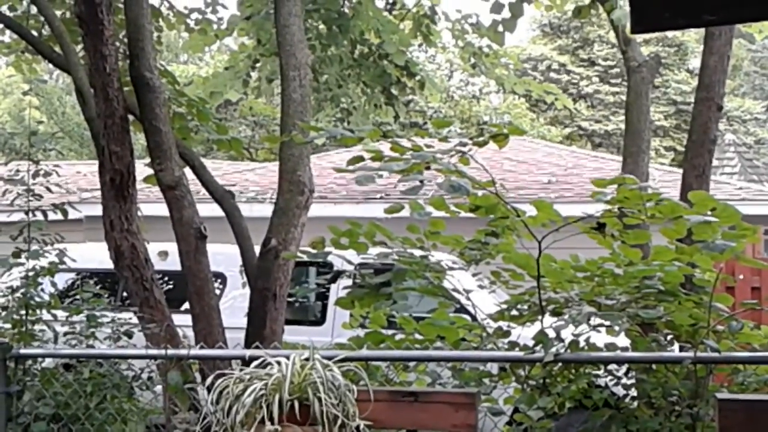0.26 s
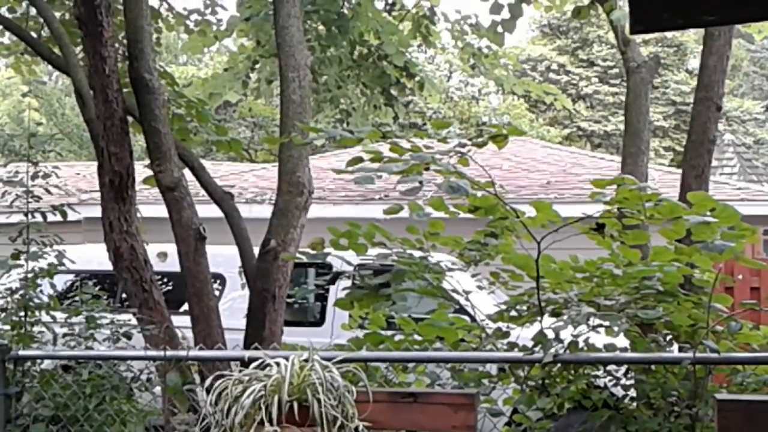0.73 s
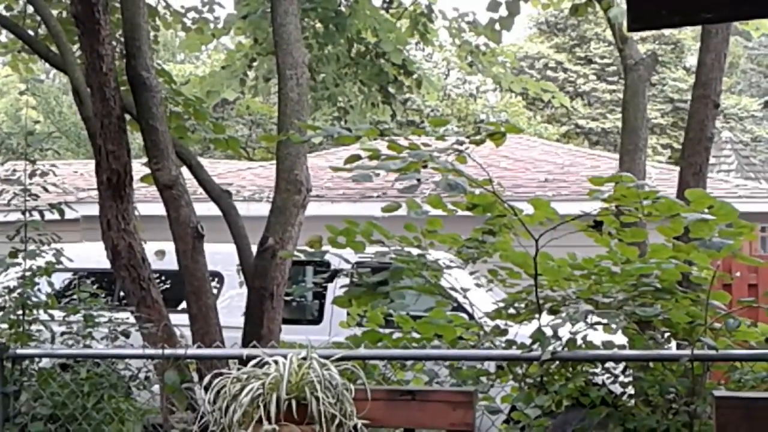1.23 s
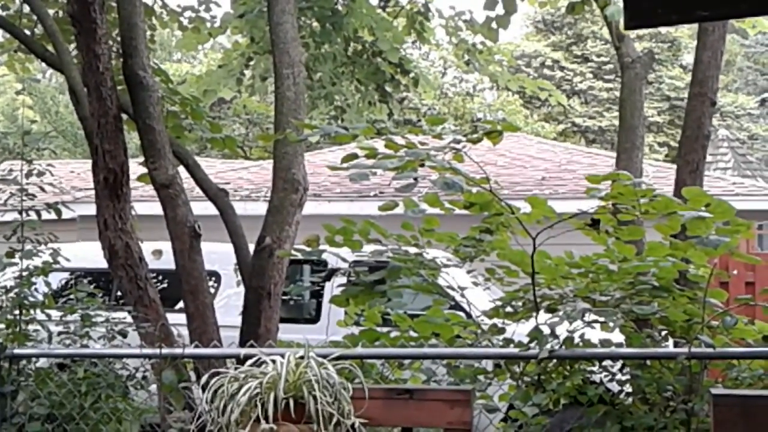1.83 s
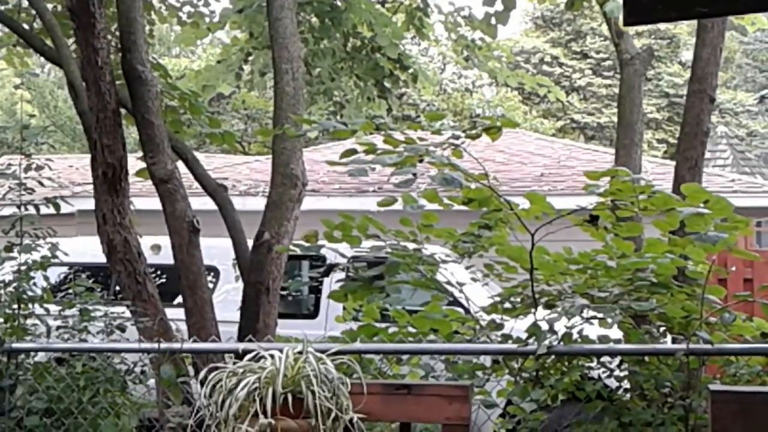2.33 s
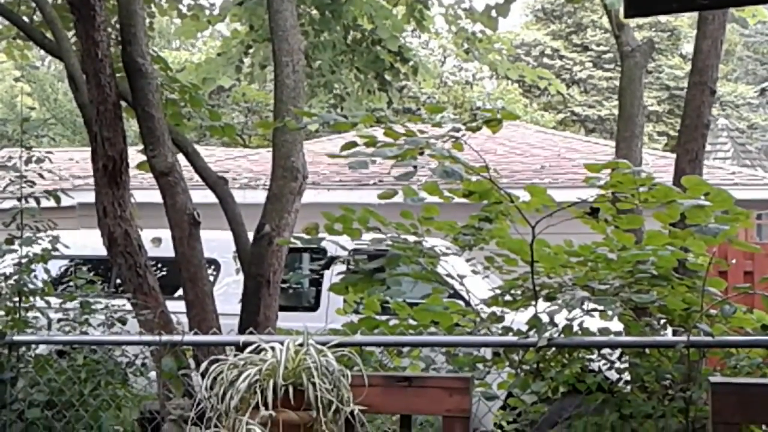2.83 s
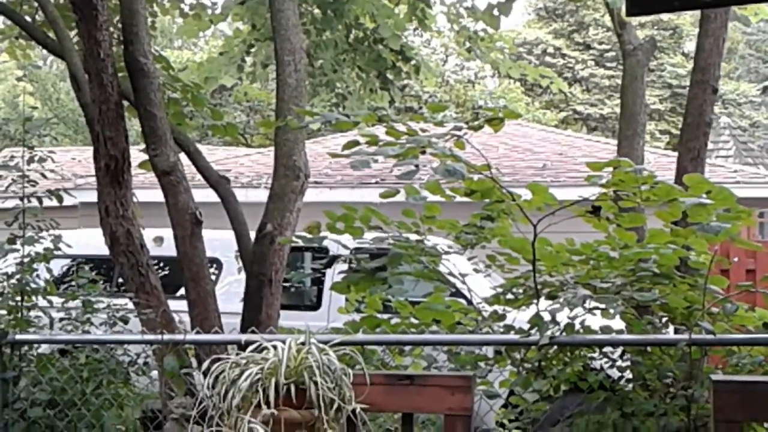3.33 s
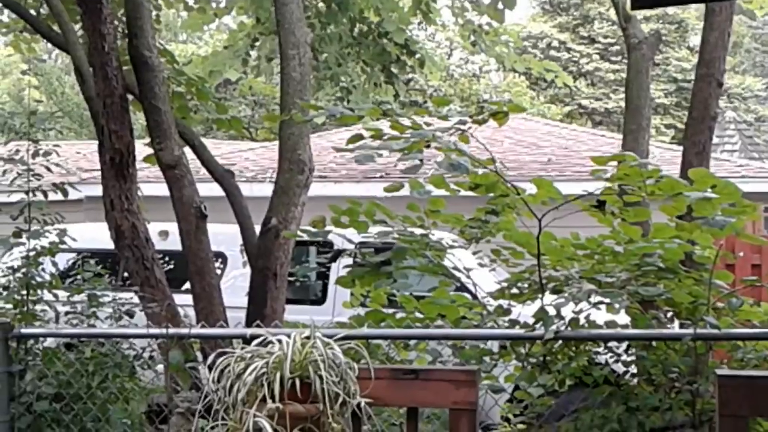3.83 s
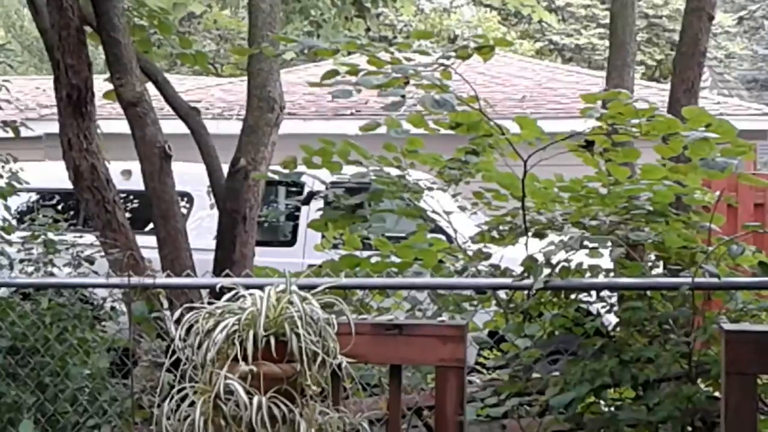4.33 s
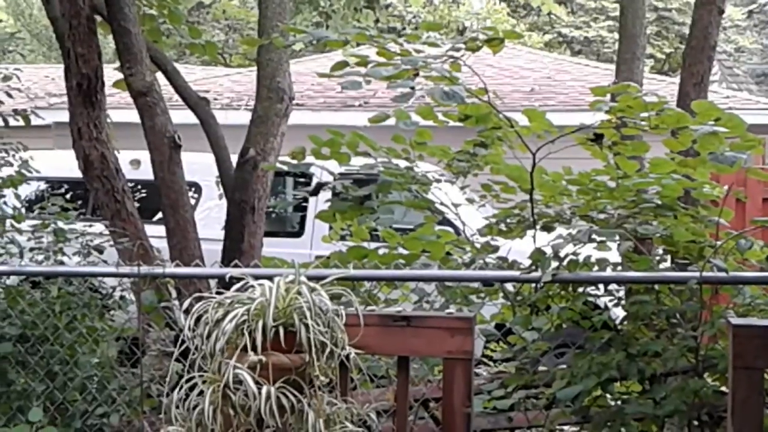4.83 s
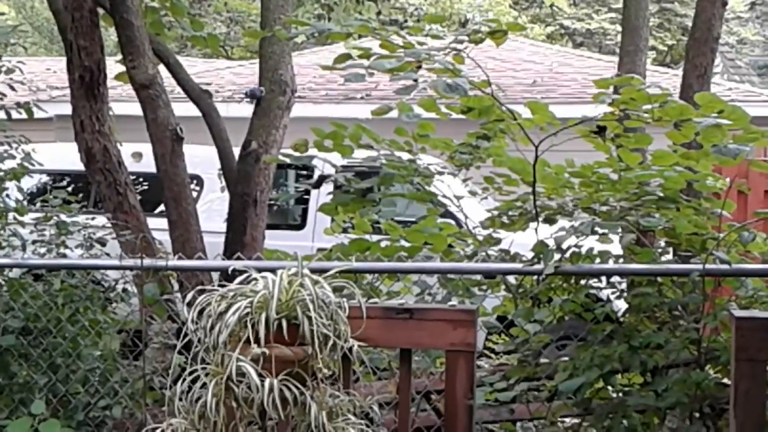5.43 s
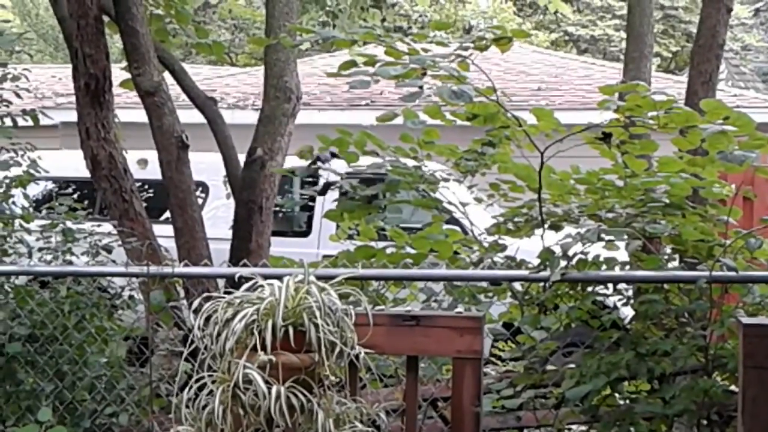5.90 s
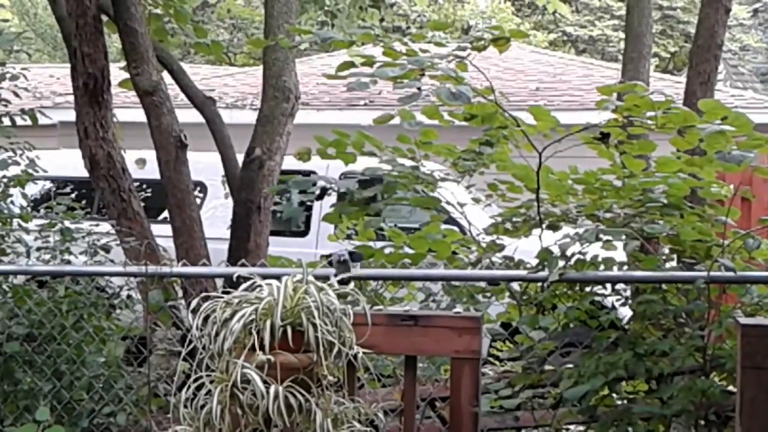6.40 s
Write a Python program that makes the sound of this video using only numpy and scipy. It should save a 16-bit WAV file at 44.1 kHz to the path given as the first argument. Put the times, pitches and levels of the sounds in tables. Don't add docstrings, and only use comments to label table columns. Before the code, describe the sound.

Quiet wooded backyard with low distant traffic hum and thin insect hiss throughout. A jay peeps faintly, small birds slur brief high whistles, and the jay gives spaced squeaks. Claws crack and scrape close by on wood, then a short loud rasping scream bursts out and echoes off houses and trees. Softer hoots and murmurs follow. The handheld microphone's left side is muffled until a finger slips off; whistles and faint claw ticks end it.

```python
import sys
import numpy as np
from scipy import signal
from scipy.fft import rfft, irfft
from scipy.io import wavfile
from scipy.ndimage import uniform_filter1d

SR = 44100
rng = np.random.default_rng(int(sys.argv[2]) if len(sys.argv) > 2 else 0)


def generate_wav(signal):
    frames = np.transpose(np.atleast_2d(signal))
    scaled = np.clip(frames, -1, 1) * 32767
    pcm = np.round(scaled).astype(np.int16)
    wavfile.write(sys.argv[1], SR, pcm)


def convert_level_to_amplitude(level_db):
    exponent = np.asarray(level_db, float) / 20
    return 10 ** exponent


N = 293706
T = np.arange(N) / SR
HZ = np.maximum(np.fft.rfftfreq(N, 1 / SR), 1)


def on_log(table):
    hz, value = np.transpose(table)
    return np.interp(np.log(HZ), np.log(hz), value)


def colour(x, table):
    return irfft(rfft(x) * convert_level_to_amplitude(on_log(table)), N)


def hiss(table, channels):
    return colour(rng.standard_normal((channels, N)), table) * np.sqrt(SR / 2)


def walk(rate_hz):
    hold = int(SR / rate_hz)
    held = np.repeat(rng.standard_normal(8000), hold)[:N]
    return 1.3 * uniform_filter1d(uniform_filter1d(held, hold), hold)


def envelope(s, db, edge_s=0.003):
    edge = np.clip(np.minimum(T - s[0] + edge_s, s[-1] + edge_s - T) / edge_s, 0, 1)
    return convert_level_to_amplitude(np.interp(T, s, db)) * edge


def gesture(start_s, length_s, first, last, peak_db, kind):
    # peak_place (0-1 of length), rise_db, fall_db, haste (over 1 glides early)
    effort_shapes = dict(squeak=(0.49, 11.6, 10, 0.72), chirp=(0.2, 3.3, 2.1, 2.66), yip=(.3, 3, 5.2, 1.4),
                     hoot=(0.81, 7.2, 8.5, 0.688), coo=(.3, 4, 2.7, 1.6), murmur=(0.16, 1.7, 5.8, 0.56),
                     squawk=(.3, 2.3, 6.7, 0.97), growl=(0.57, 5.1, 9, 0.99), cluck=(0.32, 5, 5.3, 1.1),
                     peep=(.45, 14, 4.3, 3.47), bark=(.3, 2.8, 7.8, 1.03), whistle=(.25, 5.9, 13.6, 1.35),
                     dive=(0.9, 13, 2.8, 1.165), scrape=(.3, 7, 6.6, 1.2))
    peak, rise_db, fall_db, haste = effort_shapes[kind]
    peak = np.clip(peak, 0.05, 0.95)
    u = np.linspace(0, 1, num=25)
    control = last + (first - last) * (1 - u) ** max(haste, 0.2)
    db = peak_db - np.interp(u, [0, peak, 1], [rise_db, 0, fall_db])
    return np.transpose([start_s + length_s * u, control, db])


def voice(rows, overtone_gain, count, rasp, jitter=0.007):
    s, hz, db = np.transpose(rows)
    gain = envelope(s, db) * (1 - rasp + rasp * walk(1100))
    on = gain != 0
    glide = uniform_filter1d(np.interp(T, s, hz), size=120)
    pitch = (glide * (1 + jitter * walk(300)))[on]
    phase = 2 * np.pi * np.cumsum(pitch) / SR
    flicker = convert_level_to_amplitude(min(25 * rasp, 4) * walk(70))
    stack = 0
    for k in range(1, count + 1):
        own_flicker = np.roll(flicker, 9000 * k)[on]
        stack = stack + own_flicker * overtone_gain(k, k * pitch) * np.sin(k * phase)
    gain[on] *= np.sqrt(2) * stack
    return gain


def traffic():
    # pitch_hz, density_db (per Hz)
    hum_spectrum = [(20, -114), (40, -91), (60, -84.5), (100, -89), (130, -86), (250, -95.5), (600, -99.5),
                    (1000, -99), (2000, -105), (3000, -111), (6000, -122), (16000, -130)]
    # pitch_hz, likeness (0-1)
    port_likeness = [(20, 0), (120, 1), (300, .7), (700, 0.59), (2000, 0), (5000, 0.82)]
    common, *own = rfft(hiss(hum_spectrum, channels=3))
    like = np.clip(on_log(port_likeness), 0, 1)
    hum = irfft(np.sqrt(like) * common + np.sqrt(1 - like) * np.array(own), N)
    return hum * convert_level_to_amplitude(0.25 * (T - 0.5) + walk(2.363))


def insects():
    # pitch_hz, density_db (per Hz)
    insect_band = [(3200, -125), (3900, -109), (4500, -102), (5100, -106), (5600, -122)]
    left_right_db = np.array([[-6.0], [0]])
    chorus = hiss(insect_band, channels=2) * convert_level_to_amplitude(left_right_db)
    return chorus * convert_level_to_amplitude(1.2 * walk(3) + 1.5 * walk(12))


def claw_ticks():
    # start_s, peak_db, ring_hz, t60_s, crack_db
    tick_rows = [(2.4, -29, 3340, 0.0023, -22), (2.402, -37, 4340, 0.011, -20),
                 (2.408, -34, 3500, 0.027, -15), (2.408, -42, 480, 0.036, -20),
                 (2.408, -45, 1950, 0.025, -20), (2.426, -42, 5000, 0.015, -17),
                 (2.43, -45, 708, 0.013, -17), (3.856, -51, 4240, 0.029, -5.5),
                 (3.949, -57, 3000, 0.028, -13.5), (4.636, -72, 1460, .02, -15),
                 (6.316, -51, 1770, 0.011, -16), (6.557, -58, 2760, 0.013, -5.5),
                 (6.595, -46.5, 2200, 0.029, -2)]
    out = np.zeros(N)
    t = T[:SR // 10]
    crack = 2 * uniform_filter1d(rng.standard_normal(len(t)), size=5) * np.exp(-t / 0.00019)
    for s, db, hz, t60, crack_db in tick_rows:
        ring = np.sin(2 * np.pi * hz * t) * np.exp(-np.log(1000) * t / t60)
        i = int(s * SR)
        out[i:i + len(t)] += (convert_level_to_amplitude(db) * (ring + convert_level_to_amplitude(crack_db) * crack))[:N - i]
    return out


def claw_scrapes():
    # start_s, length_s, bark_share_from (0-1, rest is branch), bark_share_to (0-1), peak_db
    scrape_rows = [
        (2.427, 0.073, .95, 0.35, -41.5),
        (2.478, 0.11, 0.2, .1, -50.5),
        (3.697, 0.057, 1, 1, -61.5),
        (6.289, 0.11, 0.4, 0.87, -62.5),
        (6.552, 0.031, 0.1, .1, -61.5),
        (6.593, 0.01, 0.6, 1, -57),
        (6.599, .05, 0.8, 0.7, -68.5),
    ]
    # pitch_hz, gain_db
    bark_body = [(500, -23.5), (1500, 3.5), (2300, 2), (3700, 5), (4600, -6), (5500, -13), (8000, -28),
                 (16000, -42.5)]
    # pitch_hz, gain_db
    branch_body = [(100, -32.5), (250, 3), (600, 4.5), (1200, 11.5), (1700, 0.5), (2500, -42),
                   (16000, -58.5)]
    bark = colour(rng.standard_normal(N) * convert_level_to_amplitude(2.0 * walk(300)), bark_body)
    branch = colour(rng.standard_normal(N) * convert_level_to_amplitude(2.0 * walk(300)), branch_body)
    out = np.zeros(N)
    for row in scrape_rows:
        s, share, db = gesture(*row, "scrape").T
        bright = np.clip(np.interp(T, s, share), 0, 1)
        grains = np.sqrt(bright) * bark / bark.std() + np.sqrt(1 - bright) * branch / branch.std()
        out += envelope(s, db) * grains
    return out


def songbirds():
    # start_s, length_s, pitch_from_hz, pitch_to_hz, peak_db
    whistle_rows = [(0.39, 0.017, 3930, 4230, -49), (0.409, 0.032, 4230, 3660, -52),
                    (0.446, 0.0315, 3560, 3800, -47.5), (0.569, 0.03, 3740, 3517, -52.5),
                    (0.594, 0.012, 3640, 5200, -51), (2.458, 0.041, 5370, 5570, -56.5),
                    (2.926, .018, 4270, 4380, -50.5), (2.993, 0.021, 3930, 4270, -55),
                    (3.125, 0.024, 4130, 4170, -55), (3.832, 0.018, 4330, 4800, -52.5),
                    (4.07, 0.019, 3890, 4860, -50.5), (4.089, 0.028, 5110, 5200, -62.5),
                    (4.394, 0.01795, 3150, 2492, -53.5), (4.41, 0.019, 2470, 2480, -59),
                    (4.688, 0.025, 2700, 2950, -62), (4.723, 0.031, 3250, 2530, -60.5),
                    (4.743, 0.05, 2484, 2495, -57), (6.285, 0.045, 7100, 6950, -66.5)]

    def faint_octave(k, hz):
        return convert_level_to_amplitude(-20 * (k - 1))

    out = 0
    for row in whistle_rows:
        kind = "dive" if row[3] < 0.83 * row[2] else "whistle"
        out = out + voice(gesture(*row, kind), faint_octave, count=2, rasp=0.17, jitter=0.012)
    return out


def jay():
    # time_s, pitch_hz, level_db
    scream = [
        (2.693, 1322, -42),
        (2.705, 1193, -29),
        (2.721, 1123, -24),
        (2.73, 1022, -23),
        (2.736, 1080, -19.5),
        (2.739, 1052, -23.5),
        (2.745, 1064, -27),
        (2.747, 1064, -34.5),
    ]
    # start_s, length_s, pitch_from_hz, pitch_to_hz, peak_db
    squeaks = [
        (1.142, 0.021, 1016, 1096, -36.5),
        (1.745, 0.036, 971, 1255, -40),
        (3.118, 0.0244, 1004, 1108, -36.5),
    ]
    chirps = [
        (1.165, .032, 1086, 1336, -41.5),
    ]
    yips = [
        (.795, 0.041, 773, 914, -51),
    ]
    hoots = [
        (.84, 0.03, 865, 770, -60),
        (1.398, 0.016, 774, 607, -55.5),
        (2.957, .043, 865, 1008, -50.5),
        (3.04, 0.0614, 821, 924.4, -40.5),
        (3.102, 0.031, 941, 1010, -45.5),
        (3.142, 0.021, 1152, 1250, -46.5),
        (3.322, 0.025, 551, 599.4, -54),
        (3.866, 0.0217, 821, 736, -59),
    ]
    coos = [
        (3.343, .058, 618.3, 632.4, -49),
    ]
    murmurs = [
        (3.4, 0.019, 632, 656, -53.5),
        (3.45, 0.044, 637.4, 650, -56.5),
        (3.51, 0.034, 656.6, 700, -57),
    ]
    squawks = [
        (2.75, 0.0396, 1167, 1238, -28),
        (2.785, 0.18, 1324, 1166, -40),
    ]
    barks = [
        (3.858, 0.0094, 1061, 875, -51),
        (3.868, .012, 1145, 990, -55),
    ]
    growls = [
        (2.738, 0.033, 575.3, 607.6, -27),
    ]
    clucks = [
        (1.378, .022, 950, 797, -51.5),
        (3.018, 0.02, 919.5, 890, -44.5),
    ]
    peeps = [
        (.108, .065, 660, 941, -56.5),
        (.2, 0.092, 940, 980, -76),
    ]
    # mouth_hz, width_hz, fundamental_db
    mouths = dict(scream=(2080, 590, -17), squeak=(2140, 850, -12.5), chirp=(2240, 1660, -14),
              yip=(2250, 1470, -1.5), hoot=(1990, 1070, 5.5), cluck=(1750, 650, -11.5),
              peep=(2480, 1300, -16), growl=(2070, 1170, -20), coo=(2160, 1070, -3),
              murmur=(1400, 1800, 1.1), squawk=(2000, 1130, -10), bark=(2080, 3900, -3))
    rasps = dict(scream=.02, squeak=.1, chirp=.2, yip=.09, hoot=.12, coo=.17, murmur=.25, squawk=.45, growl=.6, cluck=.14, peep=.25, bark=.85)
    # pitch_hz, gain_db
    beak = [(300, -44), (600, 1.5), (3300, 0.5), (4200, 3.5), (5200, -3), (6200, -0.5), (7300, 2.5),
            (9000, -13.5), (16000, -50.5)]
    calls = dict(squeak=squeaks, chirp=chirps, yip=yips, hoot=hoots, coo=coos, murmur=murmurs,
                 squawk=squawks, bark=barks, growl=growls, cluck=clucks, peep=peeps)
    notes = [("scream", scream)]
    for kind, rows in calls.items():
        notes += [(kind, gesture(*row, kind)) for row in rows]
    out = 0
    for kind, rows in notes:
        mouth_hz, width_hz, low_db = mouths[kind]

        def throat(k, hz):
            if k == 1:
                return convert_level_to_amplitude(low_db)
            return 1 / (1 + (2 * (hz - mouth_hz) / width_hz) ** 2) ** 1.116

        out = out + voice(rows, throat, count=7, rasp=rasps[kind])
    return colour(out, beak)


def echo(x, wet_db, length=1.0):
    # band_top_hz, near_walls_t60_s, far_trees_t60_s
    decay_bands = [
        (920, 0.25, 1.62),
        (1554, 0.43, 1.56),
        (3000, 0.36, 1.67),
        (5000, 0.58, 1.46),
        (15800, 0.85, 1.9),
    ]
    # pitch_hz, gain_db
    echo_tint = [(500, -12.5), (860, 5), (1050, -8), (1300, 0), (1520, -4.5), (2100, -4), (2500, 5.5),
                 (3100, -2.5), (3700, -9), (8000, -8.5)]
    first_s, rise_s, far_db, sway_s = 0.013, 0.00074, -13, 0.0001
    size = 2 * SR
    t = T[:size]
    response = np.zeros((2, size))
    lumpy = rng.standard_normal((2, size)) * convert_level_to_amplitude(-0.5 * walk(120)[:size])
    low = 200
    for top, near_s, far_s in decay_bands:
        band = signal.sosfilt(signal.butter(2, [low, top], "bandpass", fs=SR, output="sos"), lumpy)
        near = convert_level_to_amplitude(-60 * t / near_s / length)
        far = convert_level_to_amplitude(far_db - 60 * t / far_s / length)
        response += band * (near + far)
        low = top
    response *= np.clip((t - first_s) / rise_s, 0, 1) * convert_level_to_amplitude(wet_db)
    wet = signal.fftconvolve(colour(x, echo_tint)[None], response, axes=1)[:, :N]
    return x + np.array([np.interp(T + sway_s * walk(25), T, port) for port in wet])


def scene():
    background = traffic() + insects()
    wood = echo(claw_ticks() + claw_scrapes(), wet_db=-39)
    small_birds = echo(songbirds(), wet_db=-20.5, length=0.38)
    return background + wood + small_birds + echo(jay(), wet_db=-25.5)


def fingered_port(left):
    # pitch_hz, gain_db
    finger_loss = [(20, 7), (120, -8), (400, -17.5), (1000, -24), (2200, -60), (3200, -92), (5000, -39.5),
                   (16000, -33)]
    uncovered = np.clip((T - 4.15) / 0.016, 0, 1)
    muffled = np.roll(colour(left, finger_loss), shift=16)
    since = np.maximum(T - 4.042, 0)
    thump = convert_level_to_amplitude(-50) * np.sin(2 * np.pi * 160 * since) * np.exp(-since / 0.0071)
    return uncovered * left + (1 - uncovered) * muffled + thump


def noise_reducer_gain(right):
    loud_db = 10 * np.log10(uniform_filter1d(right ** 2, size=6000) + 1e-12)
    lift_db = 2.23 * uniform_filter1d(np.clip((loud_db + 62.0) / 8, 0, 1), size=4000)
    return convert_level_to_amplitude(lift_db)


def band_limit(x):
    return signal.sosfilt(signal.butter(12, 15820, fs=SR, output="sos"), x)


def record(dry):
    # pitch_hz, density_db (per Hz)
    capsule_hiss = [(20, -112), (60, -99), (200, -94.5), (600, -102), (1500, -106), (3000, -114),
                    (4500, -120), (7000, -116), (10500, -119), (13000, -117), (16000, -118)]
    ports = np.array([fingered_port(dry[0]), dry[1]]) + hiss(capsule_hiss, channels=2)
    return band_limit(ports * noise_reducer_gain(dry[1]))


dry = scene()
out = record(dry)
generate_wav(out)
```